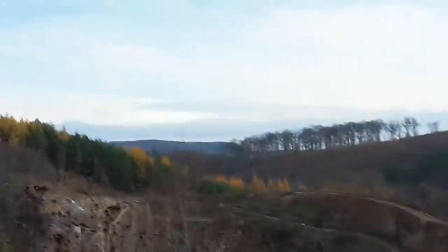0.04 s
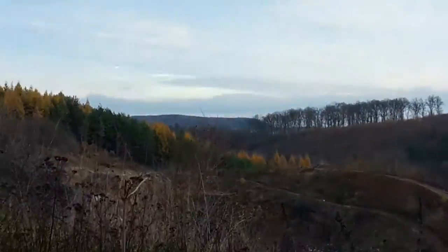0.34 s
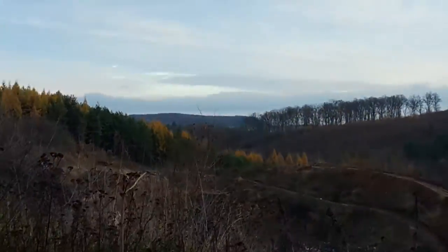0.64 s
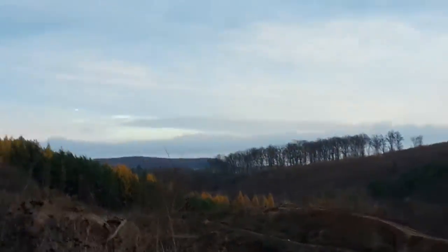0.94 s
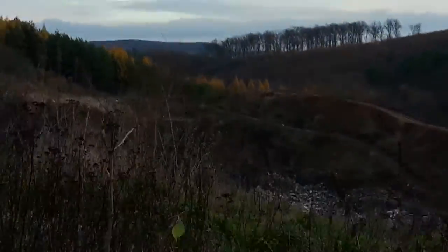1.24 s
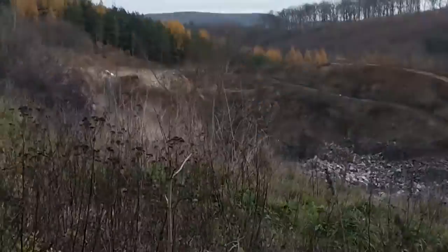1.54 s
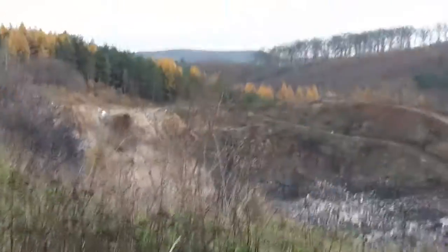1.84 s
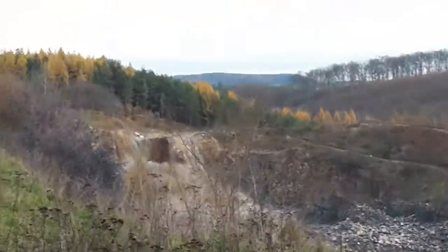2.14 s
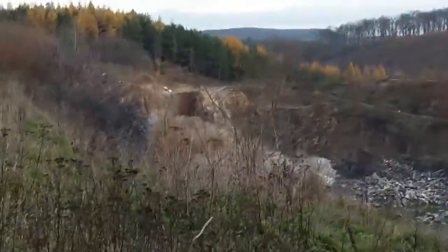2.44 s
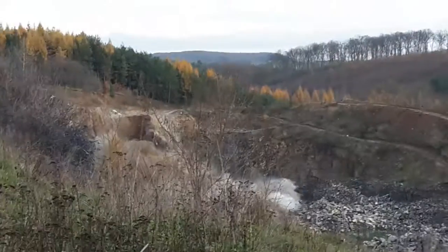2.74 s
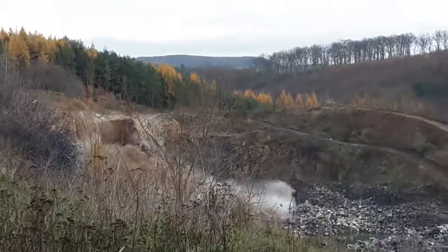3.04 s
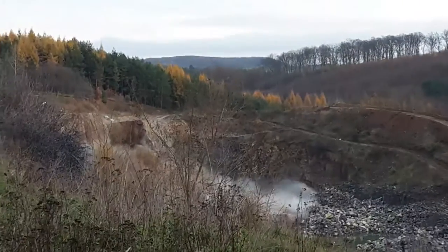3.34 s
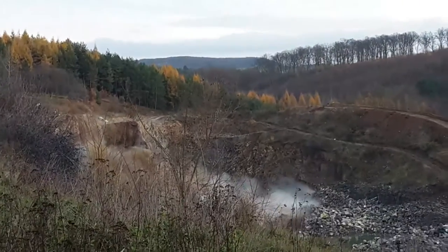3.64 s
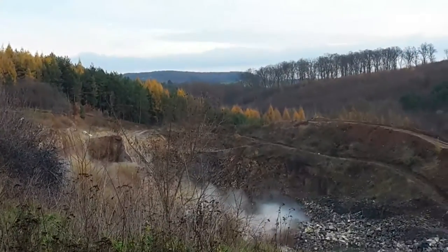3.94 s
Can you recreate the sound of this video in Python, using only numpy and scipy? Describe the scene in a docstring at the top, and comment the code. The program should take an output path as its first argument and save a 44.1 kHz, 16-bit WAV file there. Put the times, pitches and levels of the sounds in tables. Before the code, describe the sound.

A quarry blast cracks rapidly, then rock collapses in a swelling, rumbling roar.

```python
"""A quarry blast from the rim, on a stereo microphone in the open. Across the pit, fuses crackle and
detonators crack along the bench, the main ones some 34 ms apart; buried charges heave the ground in low
thumps. The face slumps, then collapses in a swelling roar of tumbling rock over a deep rumble.
As it swells, a breeze puffs on the microphone and large rocks knock one by one in the distance.
Just after two seconds a dry stalk ticks close by on the left."""
import sys
import numpy as np
from scipy import signal
from scipy.fft import rfft, irfft, next_fast_len
from scipy.io import wavfile
from scipy.ndimage import map_coordinates

SR = 44100
rng = np.random.default_rng(int(sys.argv[2]) if len(sys.argv) > 2 else 0)


def to_wav(sig):
    """Store sig (one row per channel, or 1-D mono) as 16-bit WAV at the path in sys.argv[1].

    Samples outside -1..1 are clipped; the rate is SR.
    """
    pcm = np.clip(np.atleast_2d(sig), -1, 1) * 32767
    pcm = np.round(pcm).astype(np.int16)
    wavfile.write(sys.argv[1], SR, pcm.T)  # frames by channels


N = 176400
TIME = np.arange(N) / SR


def amp(db):
    """Decibels to gain."""
    return 10 ** (np.asarray(db) / 20)


def unit(x):
    """Scale to rms 1."""
    return x / np.sqrt(np.mean(x ** 2) + 1e-20)


def along(points, hz):
    """Read (f/Hz, value) points on a log axis."""
    freqs, values = np.transpose(points)
    return np.interp(np.log(hz + 1), np.log(freqs + 1), values)


def level(points):
    """Gain per sample from (t/s, level/dB) points."""
    return amp(np.interp(TIME, *np.transpose(points)))


def filtered(x, response):
    """Pass x through a complex response of frequency."""
    size = next_fast_len(N + SR // 2)
    return irfft(rfft(x, size) * response(np.fft.rfftfreq(size, 1 / SR)), size)[..., :N]


def pulse(colour, size=4096):
    """The sharpest causal pulse with this spectrum, peak 1."""
    cepstrum = irfft(np.log(amp(along(colour, np.fft.rfftfreq(size, 1 / SR)))))
    cepstrum[1:size // 2] *= 2
    cepstrum[size // 2 + 1:] = 0
    wave = irfft(np.exp(rfft(cepstrum)))
    return wave / np.abs(wave).max()


def struck(hits, colour):
    """Sound a pulse of this colour at every hit in a pair of signals."""
    return signal.fftconvolve(hits, pulse(colour)[None], axes=1)[:, :N]


def add(track, start_s, x):
    """Mix x into the track."""
    part = track[..., max(0, round(start_s * SR)):][..., :x.shape[-1]]
    part += x[..., :part.shape[-1]]


# how alike diffuse sound is at the two microphone ports (f/Hz, correlation)
COHERENCE = [(30, 1), (70, 0.98), (130, 1), (250, 1), (450, .95), (850, 0.91), (1600, 0.64), (2300, 0.5),
             (3200, 0.55), (6000, 0)]

def spread(pair, colour=((1, 0),)):
    """Colour two unrelated signals (flat by default) and blend them into a diffuse left and right."""
    def response(hz):
        angle = np.arccos(np.clip(along(COHERENCE, hz), -1, 1)) / 2
        return amp(along(colour, hz)) * [np.cos(angle), np.sin(angle)]
    mid, side = filtered(pair, response)
    return np.array([mid + side, mid - side])


def tail(t60_s, rise_s, lumpy=0):
    """A pair of dying noise bursts, energy about 1 each; lumpy makes separate echoes stand out."""
    t = np.arange(SR // 5) / SR
    ledges = np.repeat(rng.standard_normal(len(t) // 32 + 1), 32)[:len(t)]
    shape = amp(-60 * t / t60_s) * (1 - np.exp(-(t / rise_s) ** 2))
    shape *= np.exp(lumpy * np.clip(ledges, -2, 2))
    return rng.standard_normal((2, len(t))) * shape / np.linalg.norm(shape)


def whiten(echoes):
    """Even out the spectrum and keep 50 ms, so that short echoes crackle without a hollow note."""
    spectrum = rfft(echoes)
    return irfft(spectrum / np.abs(spectrum)) * (np.arange(echoes.shape[1]) < SR / 20)


def tumble(colour, per_s, spread_db, share, flutter_db, flutter_hz):
    """Rock on rock, rms 1: single impacts carry a share of the power, countless small ones the rest."""
    hits = (rng.random(N) < per_s / SR) * amp(spread_db * np.clip(rng.standard_normal(N), -2, 2))
    hits = hits * np.array([np.sign(rng.standard_normal(N)), rng.standard_normal(N)])
    wash = rng.standard_normal((2, N))
    impacts = struck(np.sqrt(share) * unit(hits) + np.sqrt(1 - share) * wash, colour)
    flutter = map_coordinates(rng.standard_normal(1024), [TIME * flutter_hz], mode="wrap")
    return unit(spread(impacts) * amp(flutter_db * flutter))


# a fuse's snap, heard from the rim (f/Hz, level/dB)
FUSE_COLOUR = [(60, -32.5), (230, -3), (450, -6.5), (950, 4), (1500, -16), (2200, -14), (3200, -14.5),
               (5400, -36), (8000, -38), (9500, -69), (14000, -82.5)]

def fuses(per_s=240, until_s=0.52, level_db=-26, spread_db=0.5):
    """Surface fuses snap faintly along the far bench, between the main cracks."""
    fired = (rng.random(N) < per_s / SR) * (TIME < until_s)
    size = amp(level_db + spread_db * np.clip(rng.standard_normal(N), -2, 2))
    snaps = fired * size * np.array([np.ones(N), rng.standard_normal(N)])
    return spread(struck(snaps, FUSE_COLOUR))


# detonators firing along the bench (t/s, level/dB, treble/dB, scatter off nearby rock/dB)
CRACKS = [(0.023, -15, 2, -9), (0.0286, -3, 3, -9.5), (.0392, -33, -5, -3), (.0476, -31.5, -10, -12),
          (0.0606, -3.5, 0.5, -4.5), (0.0633, -17, 12.5, -6.5), (0.0705, -22.5, -7, -9.5),
          (.0822, -17, -5, -18), (0.095, -5, -4.5, -7), (0.1014, -15.5, 11, -10.5),
          (0.115, -16, -20.5, -14), (0.1304, -5, -4, -8.5), (0.149, -24, -5, -13), (0.1625, -5, 6, -6.5),
          (0.17, -6.5, -3.5, -7.5), (0.18, -17.5, -8, -7.5), (0.1966, -9, -6, 4), (.199, -10.5, 4, -7),
          (0.2107, -17.5, -8.5, -7), (0.2295, -6.5, 0.5, -3.5), (0.243, -13.5, -2, 6), (0.2631, -8, -2, 7),
          (0.267, -24.5, -0.5, -10), (0.2751, -12, -0.5, 3), (0.2978, -12.5, -2, -13.5),
          (0.2993, -1, 1, -9.5), (0.3033, -10.5, -1, -7.5), (.3102, -10.5, -4, -4), (0.3327, -6.5, 5, -7.5),
          (.338, -23, -2.5, -1), (0.343, -11.5, -2.5, -4.5), (.3677, -6, -0.5, -7), (0.3738, -7.5, 3.5, -5),
          (.402, -8.5, -4.5, -8.5), (0.4089, -5, -1.5, -4.5), (0.4417, -5, 5.5, -3), (0.4464, -5, 0, -5.5),
          (.4502, -8, -1, -6.5), (.4793, -2.5, -1.5, -9), (.484, -14.5, -7, 2), (.5155, -5.5, 1, -3),
          (.593, -5.5, 3, -8), (0.5959, -17.5, 8.5, -13)]
# how much of a crack's treble setting applies (f/Hz, share)
TREBLE_SHARE = [(900, 0.1), (4000, 0.9)]
# a crack and its two paths to the rim (f/Hz, level/dB)
CRACK_COLOUR = [(60, -25.5), (230, -12.5), (330, -7.5), (450, 2.5), (720, 0.5), (950, 3), (1200, -5),
                (1500, -6), (2100, -16), (2700, -21), (3400, -24.5), (4300, -33), (5400, -32.5),
                (6900, -44.5), (8000, -43), (9500, -56), (14000, -62)]
DIRECT_TILT = [(1200, -0.5), (3000, -1), (8000, -6.5)]  # the straight path loses treble
SCATTER_TILT = [(600, -3.5), (1500, 0.5), (4000, 4), (8000, 2)]  # rough rock throws back treble best

def detonators(walls_db=-22.5):
    """Each shock reaches the rim clean, then scattered off the nearby rock and the quarry walls."""
    direct, echoes = np.zeros(N), np.zeros((2, N))
    for start_s, db, treble_db, scatter_db in CRACKS:
        colour = [(hz, band_db + treble_db * along(TREBLE_SHARE, hz)) for hz, band_db in CRACK_COLOUR]
        shock = amp(db) * pulse(colour)
        scatter = amp(scatter_db) * whiten(tail(t60_s=0.018, rise_s=0.0014))
        walls = amp(walls_db) * tail(t60_s=0.17, rise_s=0.0084, lumpy=0.89)
        add(direct, start_s, shock)
        add(echoes, start_s, signal.fftconvolve(scatter + walls, shock[None], axes=1))
    return filtered(direct, lambda hz: amp(along(DIRECT_TILT, hz))) + spread(echoes, SCATTER_TILT)


# thumps of the ground and of big blocks down in the pit (t/s, f/Hz, level/dB)
THUMPS = [(0.199, 280, -10), (0.2051, 107.4, -7.5), (0.2052, 278, -12.5), (0.2151, 130, -18.5),
          (0.2605, 106, -14), (0.2789, 118, -10.5), (0.2968, 90, -13.5), (0.318, 71.4, -16),
          (.347, 45.6, -20), (0.363, 90, -17), (0.4978, 115.5, -19), (0.5057, 96.4, -15),
          (0.551, 95, -23.5), (0.5615, 93, -13), (0.6392, 85, -25.5), (0.649, 96.4, -20),
          (0.694, 49.8, -18), (0.7173, 55, -26), (0.7898, 61.8, -11), (0.847, 67, -11.5),
          (0.89, 91.3, -17.5), (0.9434, 65, -21.5), (0.975, 78.7, -17), (1.56, 147, -17), (1.572, 137, -24),
          (2.7, 155, -17), (3.14, 135, -16), (3.496, 115, -16)]
# shaking of the bench (t/s, level/dB) and its spectrum (f/Hz, level/dB)
HEAVE = [(0, -48.5), (.18, -31), (.21, -21.5), (.36, -22.5), (.42, -26), (.5, -26), (.6, -26), (.75, -25),
         (.92, -24.5), (1.1, -28), (1.3, -32), (1.9, -34), (3, -37), (4, -42)]
HEAVE_COLOUR = [(15, -5.5), (32, -1.5), (55, 9.5), (115, 5.5), (170, -1.5), (260, -32), (600, -73.5),
                (1500, -120)]

def ground(half_width_cycles=0.47):
    """Each thump reaches the microphone as one short swing of pressure, over the shaking of the bench."""
    thumps = np.zeros(N)
    for centre_s, hz, db in THUMPS:
        cycles = (TIME - centre_s) * hz
        swing = np.sin(2 * np.pi * cycles) * np.exp(-.5 * (cycles / half_width_cycles) ** 2)
        thumps += amp(db) * swing / swing.max()
    shaking = tumble(HEAVE_COLOUR, per_s=160, spread_db=2.5, share=0.5, flutter_db=0, flutter_hz=23)
    return thumps + level(HEAVE) * shaking


# the face coming down across the pit: first slide, then debris from coarse to fine (t/s, level/dB)
SLUMP = [(.6, -43.5), (.85, -35.5), (1.1, -36), (1.35, -31), (1.6, -33), (2, -58)]
BLOCKS = [(0, -46), (.9, -33), (1.3, -47), (1.65, -34.5), (2.1, -25), (2.3, -22.5), (2.55, -27),
          (2.8, -27.5), (3.15, -23), (3.38, -27.5), (3.5, -22), (3.7, -25), (4, -23.5)]
ROAR = [(0, -34), (.3, -26.5), (.55, -34), (.66, -33.5), (.9, -33), (1.2, -31.5), (1.5, -26.5), (1.7, -22),
        (2.25, -19), (2.8, -20), (3.15, -22.5), (3.5, -23.5), (4, -24)]
CHIPS = [(0, -42.5), (.5, -41.5), (.65, -43.5), (.9, -44), (1.25, -39.5), (1.55, -32.5), (1.85, -28.5),
         (2.3, -26), (2.8, -26.5), (3.3, -29.5), (4, -29)]
GRIT = [(0, -55), (.5, -62), (.65, -80.5), (.95, -96), (1.25, -77), (1.55, -56.5), (1.85, -45),
        (2.25, -43.5), (2.8, -44.5), (3.3, -49), (4, -49)]
# the spectrum of each at the rim (f/Hz, level/dB)
SLUMP_COLOUR = [(60, -40.5), (220, -17), (290, 2.5), (400, -2.5), (520, -13.5), (1000, -42), (3000, -110)]
BLOCK_COLOUR = [(20, -37), (50, -19), (85, -3), (120, 1), (160, -2.5), (200, -10), (300, -18.5),
                (900, -84.5), (2000, -120)]
ROAR_COLOUR = [(60, -39.5), (150, -12), (200, -6), (260, -1), (320, -3.5), (380, -4.5), (480, 0.5),
               (620, -2), (740, -5.5), (980, -4), (1200, -10), (1500, -13.5), (2000, -29.5), (2800, -38.5),
               (6000, -100), (9000, -120)]
CHIP_COLOUR = [(500, -49.5), (1200, 6.5), (1400, 7.5), (1800, 7.5), (2000, 2.5), (2300, 1.5), (2600, -8),
               (2850, -8.5), (3050, -6), (3300, -9), (3520, -7.5), (3700, -11), (4000, -12.5),
               (4400, -18.5), (5400, -22), (6200, -37.5), (7500, -66.5), (9500, -100), (14000, -115)]
GRIT_COLOUR = [(2500, -26), (3900, 10), (4400, 1), (5000, -2), (5500, 2), (6100, -5.5), (6900, -15),
               (7600, -13.5), (8300, -17.5), (9000, -49), (14000, -84)]

def rockfall():
    """The far face slumps dully; blocks rumble, rocks roar, chips clatter and grit hisses as it falls."""
    slump = tumble(SLUMP_COLOUR, per_s=150, spread_db=2.5, share=0.28, flutter_db=2, flutter_hz=20)
    blocks = tumble(BLOCK_COLOUR, per_s=47, spread_db=5, share=0.19, flutter_db=0.8, flutter_hz=20)
    roar = tumble(ROAR_COLOUR, per_s=700, spread_db=1.5, share=0.35, flutter_db=0.5, flutter_hz=29)
    chips = tumble(CHIP_COLOUR, per_s=1200, spread_db=1, share=0.3, flutter_db=0.5, flutter_hz=52)
    grit = tumble(GRIT_COLOUR, per_s=830, spread_db=2, share=0.12, flutter_db=1, flutter_hz=38)
    return (level(SLUMP) * slump + level(BLOCKS) * blocks + level(ROAR) * roar
            + level(CHIPS) * chips + level(GRIT) * grit)


# breeze right on the microphone (t/s, level/dB)
BREEZE = [(0, -41), (.6, -42), (1.25, -34.5), (1.6, -27), (2.2, -29), (2.8, -27), (3.15, -29.5),
          (3.45, -31.5), (3.65, -37), (4, -41.5)]
# its stronger puffs (t/s, left level/dB, right level/dB)
PUFFS = [(1.09, -23, -35.5), (1.56, -20, -20.5), (1.701, -31, -18), (1.929, -25.5, -20.5),
         (2.515, -24, -23), (2.604, -31, -22), (2.72, -25.5, -21), (2.801, -30.5, -17.5),
         (2.979, -22.5, -19.5)]
# spectra of the buffeting (f/Hz, level/dB)
BREEZE_COLOUR = [(20, -27.5), (50, -9), (100, 3), (150, 1.5), (220, -8), (330, -4.5), (600, -28.5),
                 (1500, -75.5), (4000, -120)]
PUFF_COLOUR = [(20, -21.5), (60, 7), (120, 5.5), (280, 0), (420, -11.5), (800, -22), (2000, -74),
               (5000, -120)]

def breeze(half_width_s=0.027):
    """Eddies buffet each microphone port on its own; the stronger puffs reach higher in pitch."""
    def eddies(colour):
        return unit(filtered(rng.standard_normal((2, N)), lambda hz: amp(along(colour, hz))))
    puffs = sum(amp([[left_db], [right_db]]) * np.exp(-.5 * ((TIME - centre_s) / half_width_s) ** 2)
                for centre_s, left_db, right_db in PUFFS)
    return level(BREEZE) * eddies(BREEZE_COLOUR) + puffs * eddies(PUFF_COLOUR)


# single large rocks striking in the pit (t/s, f/Hz, level/dB)
ROCKS = [(1.486, 1180, -17), (1.703, 1200, -10.5), (1.711, 492, -11.5), (1.894, 469, -13.5),
         (2.134, 1190, -11), (2.511, 478, -17), (2.535, 1200, -12.5), (2.608, 398, -12.5),
         (2.664, 1100, -9), (2.796, 461, -10), (2.962, 1210, -20), (2.973, 505, -12.5),
         (3.232, 1200, -15.5), (3.751, 1200, -20), (3.832, 488, -19)]
# what the distance to the rim leaves of a knock (f/Hz, level/dB)
AIR_LOSS = [(1500, -2), (3000, -11), (6000, -40)]

def knocks(t60_cycles=14.2, half_width_octaves=0.53):
    """The largest rocks strike one by one above the roar: the bigger, the lower and longer the knock."""
    track, t = np.zeros((2, N)), np.arange(SR // 8) / SR
    octaves = np.log2(np.fft.rfftfreq(len(t), 1 / SR) + 1)
    for start_s, hz, db in ROCKS:
        band = np.exp(-.5 * ((octaves - np.log2(hz)) / half_width_octaves) ** 2)
        noise = irfft(rfft(rng.standard_normal((2, len(t)))) * band)
        knock = noise * amp(-60 * t * hz / t60_cycles) * (1 - np.exp(-(t * hz) ** 2))
        add(track, start_s, amp(db) * knock / np.abs(knock).max(axis=1, keepdims=True))
    return spread(track, AIR_LOSS)


# ticks and rustle of a dry stalk beside the microphone (t/s, level/dB)
TICKS = [(2.1876, -21), (2.2708, -36.5), (2.35, -42.5), (2.3888, -40)]
RUSTLE = [(2.12, -120), (2.144, -76.5), (2.154, -58.5), (2.2, -54.5), (2.27, -59.5), (2.315, -71.5),
          (2.35, -57), (2.402, -56), (2.411, -88), (2.43, -120)]
# their bright, close-up spectrum (f/Hz, level/dB)
STALK_COLOUR = [(2000, -32.5), (5000, -12), (7500, -7.5), (9300, -15), (11000, -5), (12500, -4),
                (13500, -1.5), (14500, -9), (15300, -10)]

def stalk(left_over_right_db=19):
    """A dry stalk bends close by: a faint rustle, with tiny bright snaps on the left."""
    bursts = np.zeros((2, N))
    for start_s, db in TICKS:
        add(bursts, start_s, amp(db) * tail(t60_s=0.012, rise_s=0.0003))
    pan = amp([[left_over_right_db / 2], [-left_over_right_db / 2]])
    rustle = tumble(STALK_COLOUR, per_s=840, spread_db=6, share=0.4, flutter_db=3.5, flutter_hz=60)
    return pan * struck(bursts, STALK_COLOUR) + level(RUSTLE) * rustle


def scene():
    """Blast and collapse across the pit, breeze and stalk at the microphone."""
    return fuses() + detonators() + ground() + rockfall() + breeze() + knocks() + stalk()


# imbalance of the two microphone ports (f/Hz, left over right level/dB)
PORT_BALANCE = [(60, 0), (170, -2), (460, -2.5), (760, -3.5), (1270, -3), (2110, 3), (2700, -3),
                (3520, -13), (5850, -5.5), (10000, -4)]

def record(dry, left_lead_s=0.00005, ceiling=0.9, knee=8, top_hz=15600):
    """The microphone on the rim: two unequal ports, soft overload and the recorder's band limit."""
    sides = np.array([[.5], [-.5]])
    def ports(hz):
        return amp(sides * along(PORT_BALANCE, hz)) * np.exp(2j * np.pi * hz * sides * left_lead_s)
    heard = filtered(dry, ports)
    limited = heard / (1 + np.abs(heard / ceiling) ** knee) ** (1 / knee)
    return filtered(limited, lambda hz: hz < top_hz)


dry = scene()
out = record(dry)
to_wav(out)
```